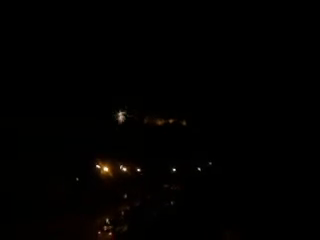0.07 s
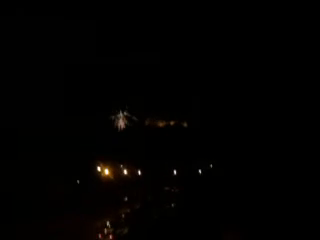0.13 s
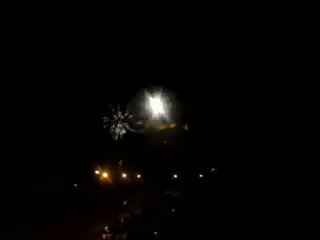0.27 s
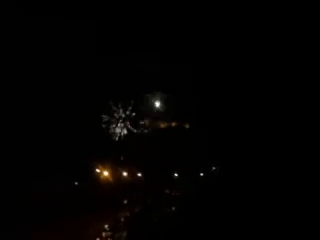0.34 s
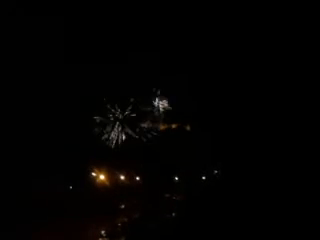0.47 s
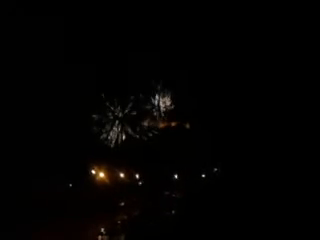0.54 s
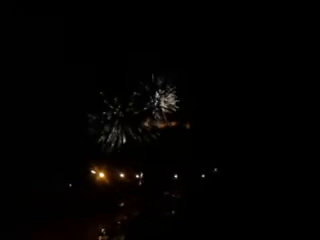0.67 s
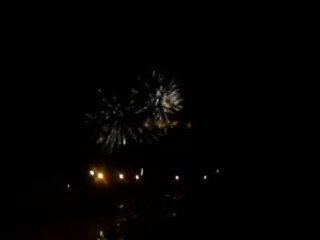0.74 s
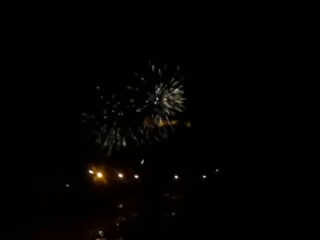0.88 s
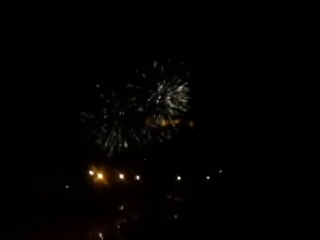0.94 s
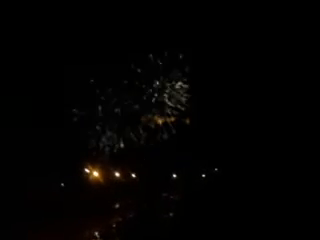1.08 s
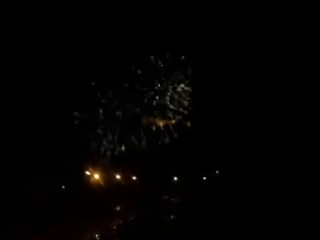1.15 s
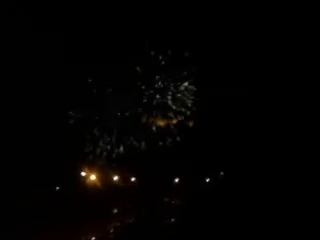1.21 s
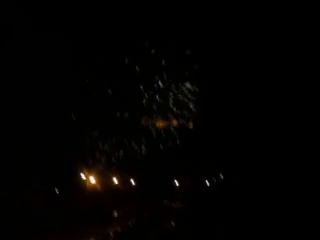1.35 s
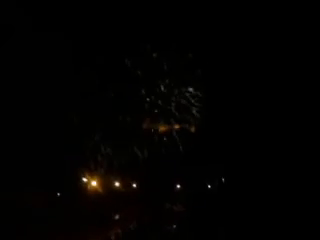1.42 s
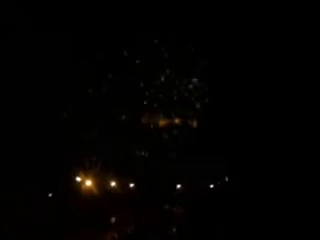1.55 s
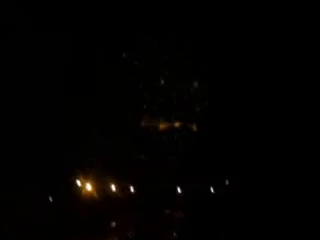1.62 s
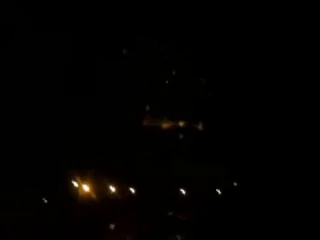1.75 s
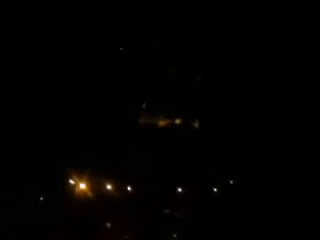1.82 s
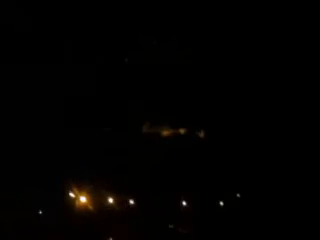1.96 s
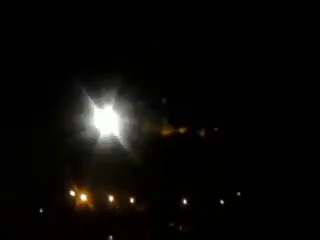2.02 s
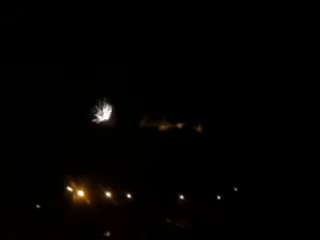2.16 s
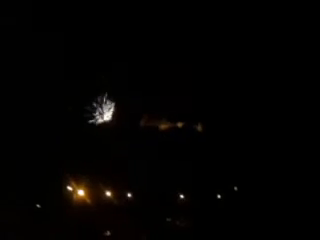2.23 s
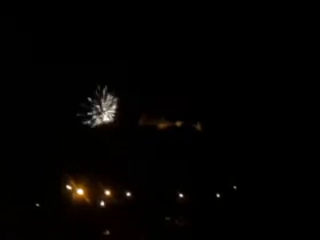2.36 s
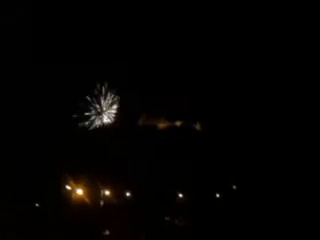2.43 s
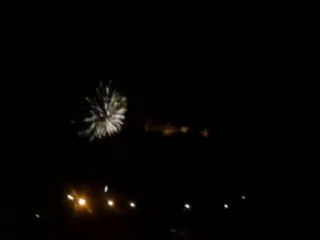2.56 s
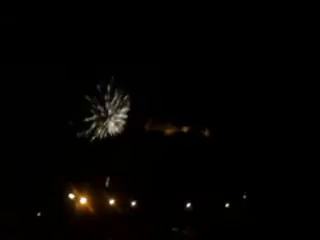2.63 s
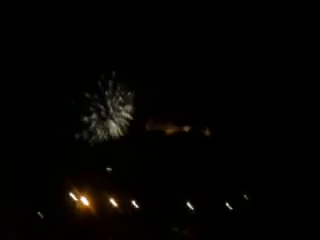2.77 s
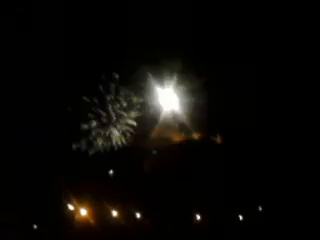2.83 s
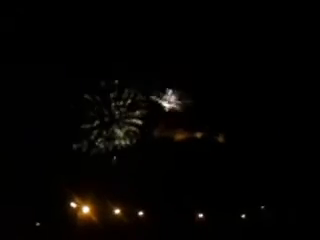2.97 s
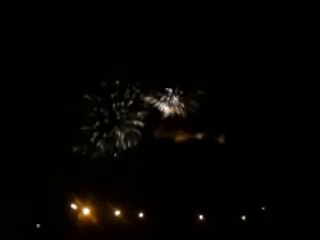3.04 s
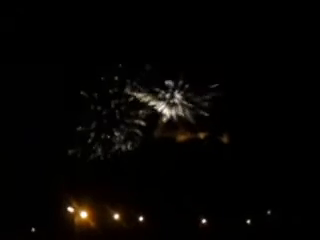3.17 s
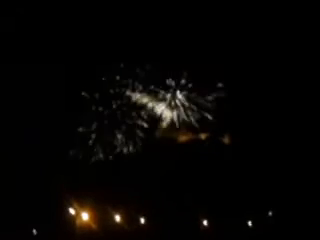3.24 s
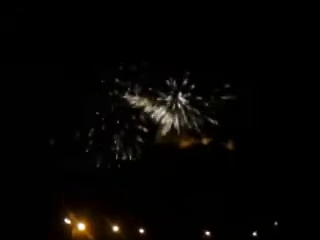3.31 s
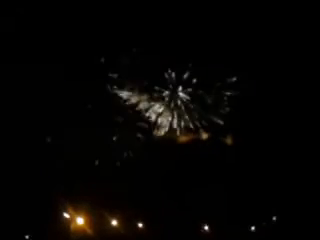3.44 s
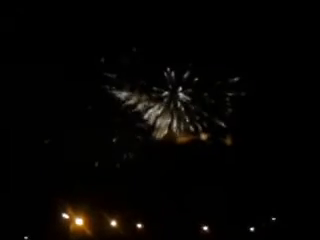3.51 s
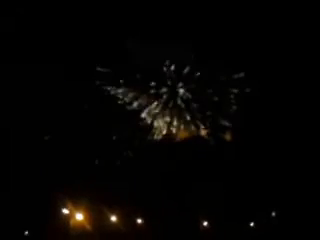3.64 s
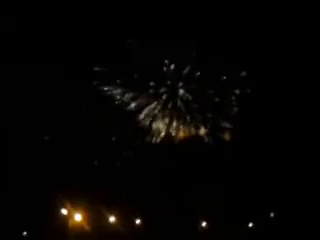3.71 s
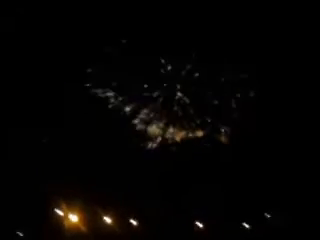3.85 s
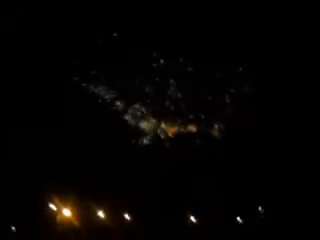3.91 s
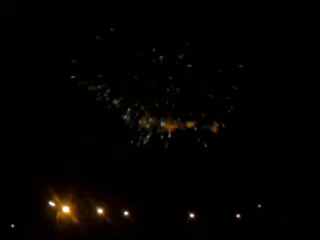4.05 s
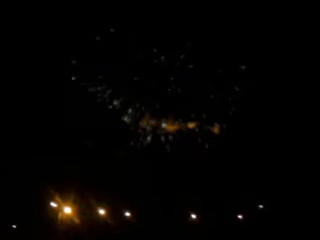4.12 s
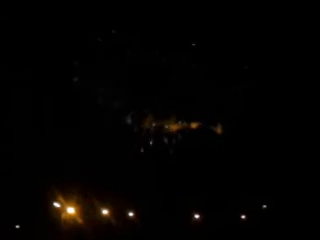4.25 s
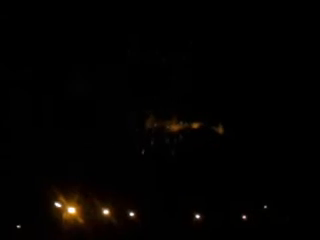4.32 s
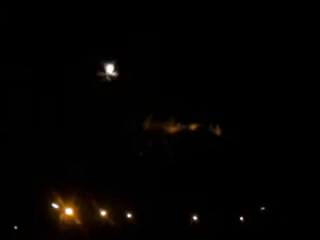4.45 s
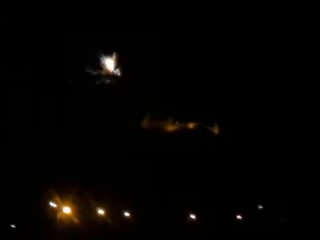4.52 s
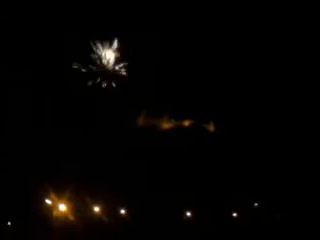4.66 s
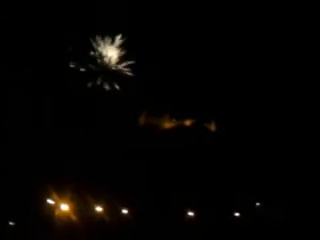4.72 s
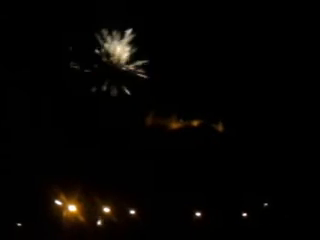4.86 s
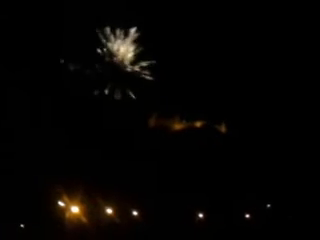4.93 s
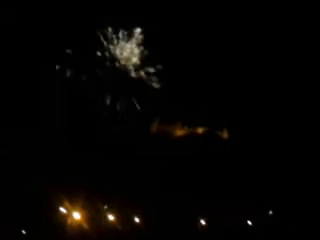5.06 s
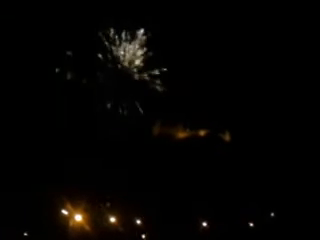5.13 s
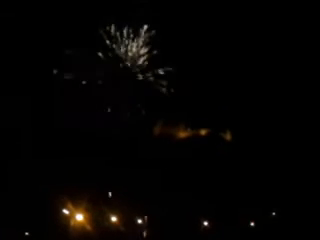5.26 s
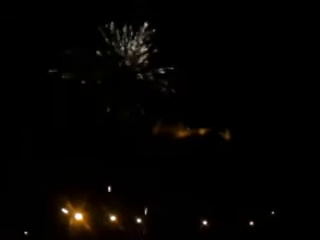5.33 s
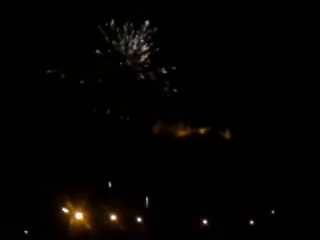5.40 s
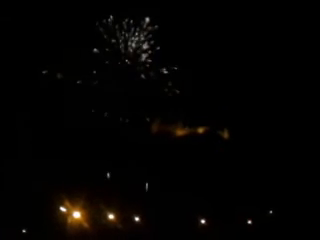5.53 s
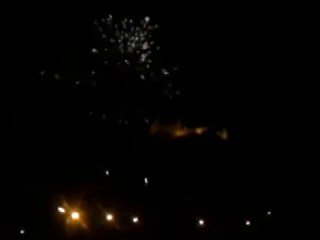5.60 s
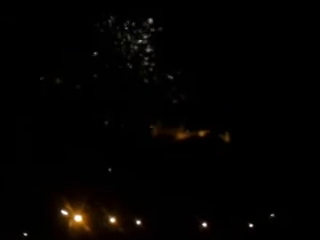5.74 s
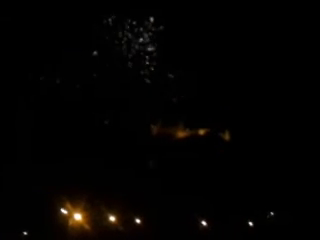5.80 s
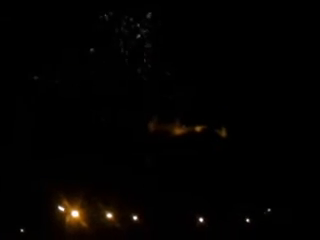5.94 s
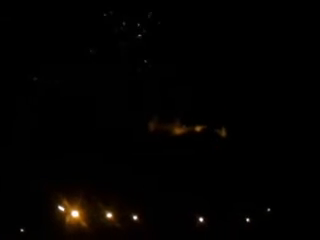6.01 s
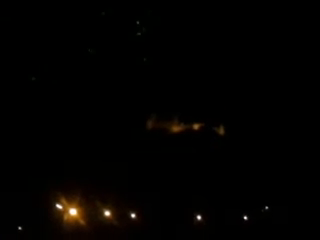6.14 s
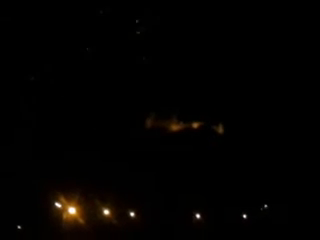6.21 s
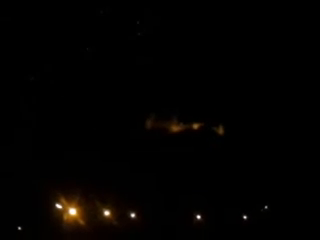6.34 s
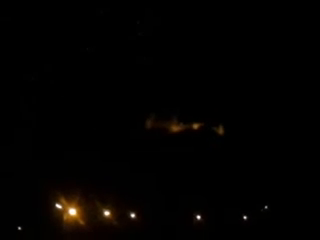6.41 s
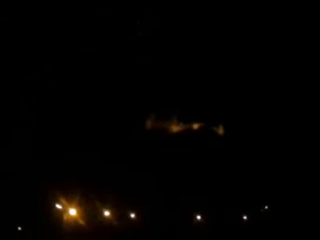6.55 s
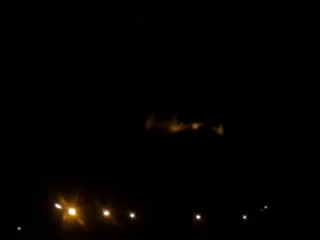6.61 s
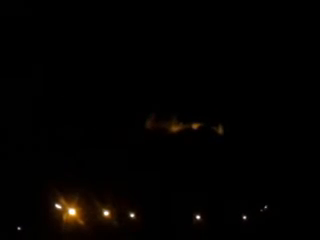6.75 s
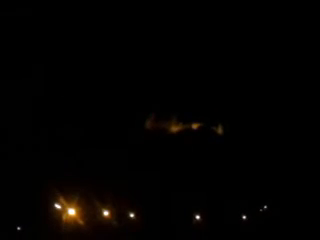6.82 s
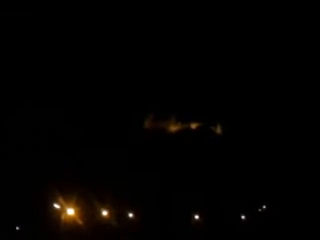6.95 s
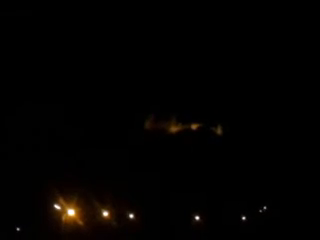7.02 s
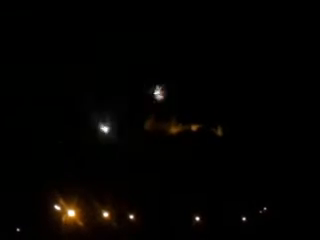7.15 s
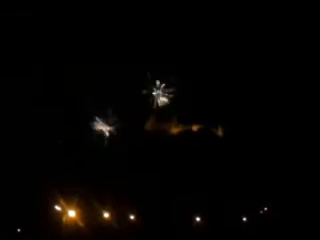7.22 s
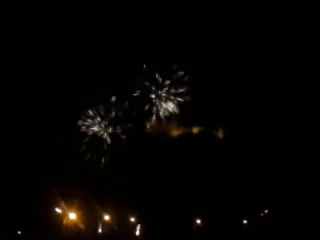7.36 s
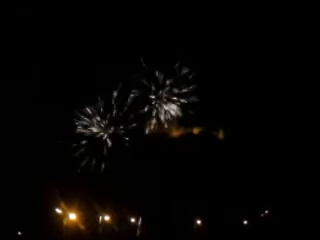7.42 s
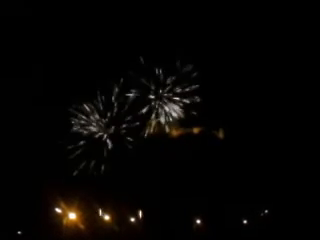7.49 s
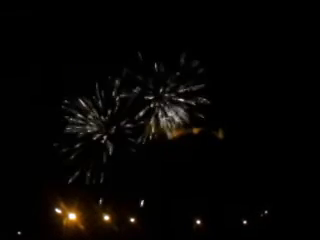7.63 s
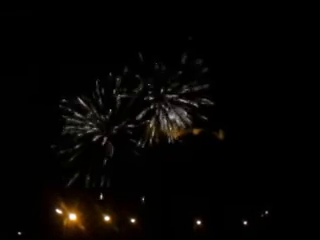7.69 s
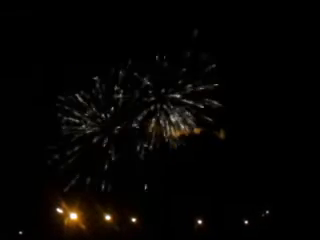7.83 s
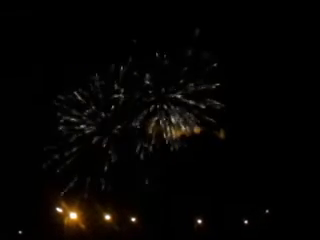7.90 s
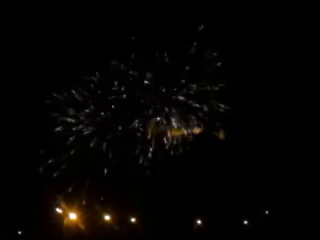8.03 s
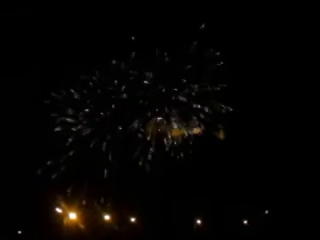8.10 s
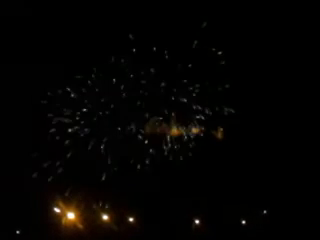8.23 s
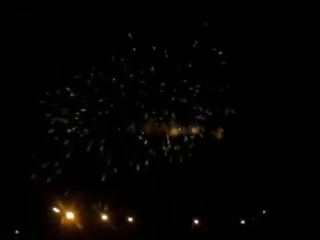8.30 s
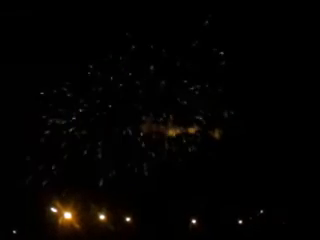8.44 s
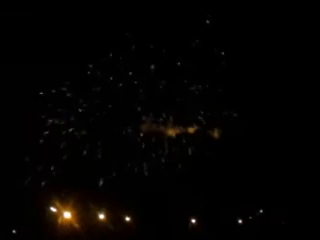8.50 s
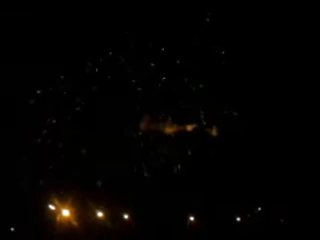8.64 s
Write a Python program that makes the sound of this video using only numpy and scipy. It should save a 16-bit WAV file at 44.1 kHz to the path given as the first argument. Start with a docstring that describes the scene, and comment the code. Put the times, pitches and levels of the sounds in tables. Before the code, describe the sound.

Distant firework shells burst with sharp, overloaded cracks and slapping echoes off buildings, amid scattered mortar pops and a long rolling rumble.

```python
"""Firework shells burst far off over a built-up shore at night. A rumble of sound rolling back from the town
runs throughout, as noise that swells and sinks; short clean pops, most likely mortars, and slap echoes dot it.
Each burst brings a bright crack in a dense swarm of near reflections, then echoes from two walls and a long wash.
All arrivals pass through a narrow-band microphone, which clips the loudest of them."""
import sys
import numpy as np
from scipy import signal
from scipy.fft import rfft, irfft
from scipy.io import wavfile
from scipy.ndimage import uniform_filter1d

SR = 44100
rng = np.random.default_rng(int(sys.argv[2]) if len(sys.argv) > 2 else 0)


def generate_wav(signal):
    """Clip the signal to [-1, 1] and save it as 16-bit WAV at the path in sys.argv[1]."""
    frames = np.transpose(np.atleast_2d(signal))
    scaled = np.clip(frames, -1, 1) * 32767
    pcm = np.round(scaled).astype(np.int16)
    wavfile.write(sys.argv[1], SR, pcm)


N = 382347

# All levels are in dB; a t60 is the time in which a sound fades by 60 dB.
# A list of four levels always holds the low, middle, high and top band.

# The shell bursts. Each row: time in seconds, swarm level in dB, swarm t60 in seconds, crack level in dB,
# crack t60 in seconds, near wall echo in dB, its t60 in seconds, far wall echo in dB.
SHELLS = [(0.659, 2.5, 0.64, 6.5, 0.04, -3.5, 0.16, -8.5), (0.96, 4, 0.68, 5, 0.084, 1, 0.21, -5),
          (2.706, 2, 0.56, -2.5, 0.044, -2.5, 0.052, -8.5), (3.49, 4, 0.62, 4.5, 0.18, 2.5, 0.19, -3),
          (5.069, 0.5, 0.6, 8.5, 0.098, 0.7, 0.078, -8.5), (7.756, 7, 0.41, 8, 0.03, 4.9, 0.17, -4),
          (7.824, 2, 0.63, 4.5, 0.076, -3.5, 0.11, -5.5)]
# How much later each burst comes back. Each row: near wall delay in seconds, far wall delay in seconds.
ECHO_DELAYS = [(.238, .589), (.249, .58), (.238, .509), (.242, .583), (.242, .527), (.245, .548),
               (.226, .504)]


def from_db(db):
    """Turns a level in dB into a gain."""
    return 10 ** (np.asarray(db) / 20)


def drift(rate_hz):
    """Slow chance: noise smoothed twice by a one-pole low-pass, scaled to a spread of 1."""
    r = np.exp(-2 * np.pi * rate_hz / SR)
    noise = rng.standard_normal(N + SR)
    slow = signal.lfilter([1], [1, -2 * r, r * r], noise)[SR:]   # drop the filter's first second
    return slow / slow.std()


def add_arrival(power, start_s, level_db, rise_s, t60_s):
    """Adds the power of one arrival: a short rise, then an even decay, for 2 seconds at most."""
    start = round(start_s * SR)
    t = np.arange(min(N - start, 2 * SR)) / SR
    rise = np.minimum(t / rise_s, 1) ** 2
    decay = from_db(-60 * np.maximum(t - rise_s, 0) / t60_s)
    gain = np.reshape(from_db(level_db), (-1, 1))
    power[:, start:start + len(t)] += (gain * rise * decay) ** 2


def band_responses(size=4096):
    """The microphone's colour of distant sound, split into four short filter responses of energy 1."""
    # Shape of the colour. Each row: frequency in Hz, relative level in dB.
    colour = np.array([(30, -39.5), (70, -19.5), (125, -18.5), (165, -11.5), (205, -4.5), (255, 0.5),
                       (370, -2), (530, -10.5), (690, -9.5), (810, -1), (945, -3.5), (1200, -18),
                       (1550, -20.5), (2150, -17), (2500, -26), (3000, -30), (3600, -36), (4300, -47),
                       (5000, -66)])
    # Edges between the four bands, in Hz.
    low, middle, high = [600, 1300, 2700]
    hz = np.maximum(np.fft.rfftfreq(size, 1 / SR), 1)
    level_db = np.interp(np.log(hz), np.log(colour[:, 0]), colour[:, 1])
    # folding the cepstrum gives minimum phase: the response starts at once, with nothing ahead of it
    cepstrum = irfft(np.log(from_db(level_db)))
    cepstrum[1:size // 2] *= 2
    cepstrum[size // 2 + 1:] = 0
    whole = irfft(np.exp(rfft(cepstrum)))
    bands = [(low, "low"), ([low, middle], "band"), ([middle, high], "band"), (high, "high")]
    responses = []
    for edge, kind in bands:
        part = signal.sosfilt(signal.butter(3, edge, kind, fs=SR, output="sos"), whole)
        responses.append(part / np.linalg.norm(part))
    return responses


def echo_grain():
    """Reflections are separate and uneven: noise whose strength flutters within milliseconds."""
    grain = rng.standard_normal(N) * from_db(1.5 * drift(250))
    return grain / grain.std()


def night_hum():
    """Steady power per band of the town at night."""
    # Level of the four bands in dB.
    hum_db = [-58, -61, -67, -80.5]
    return from_db(np.c_[hum_db]) ** 2


def faint_slaps():
    """Power per band of chance slaps, each band on its own level, as a multiple of the rumble."""
    per_s, level_db, spread_db = 9, 3, 4
    t60_s, rise_s = 0.074, 0.017
    happens = rng.random(N) < per_s / SR
    hits = happens * from_db(level_db + spread_db * rng.standard_normal((4, N))) ** 2
    # -120 because this is power: it makes a 60 dB fade in t60_s
    fading = signal.lfilter([1], [1, -from_db(-120 / (t60_s * SR))], hits + 1e-18)
    return uniform_filter1d(fading, size=round(rise_s * SR))


def roll():
    """Power per band: countless far echoes arrive in lumps, partly in step; faint slaps ride on them."""
    # The rumble over time. Each row: time in seconds, level in dB, brightness in dB.
    rumble = [(0.0, -33, 2), (0.41, -28, -4), (0.62, -36, 1.5), (1.602, -33.5, 2), (2.03, -27.5, -2.5),
              (2.411, -32, -0.5), (2.68, -40, 2.4), (3.399, -40.5, 6), (3.95, -39, 8.5), (4.35, -31.5, -1),
              (4.52, -30.5, -11), (4.6, -38, 2.5), (4.75, -35, -1), (5.05, -32.5, -2.5), (5.7, -40, 4.5),
              (6.08, -42.5, 4), (6.599, -40, 0.2), (6.71, -39, -1.6), (6.851, -51, 1), (6.92, -59, 8.5),
              (6.97, -54, -2), (7.25, -56, -5), (7.701, -71.5, -0.3), (8.67, -41, 2.5)]
    # Share of the four bands in the rumble, in dB.
    rumble_db = [-2.4, -1, -8.5, -28.5]
    # How strongly each of the four bands follows the brightness, as a factor.
    brightens = [0.71, 1.1, 1.4, 1.6]
    # Long wash after each burst: level of the four bands in dB against the swarm, then their t60 in seconds.
    wash_db = [-27.5, -28.5, -28.5, -50]
    wash_t60_s = [2.84, 2.83, 2.04, 1.9]
    wash_rise_s = 0.13

    times, levels_db, brights_db = np.transpose(rumble)
    clock = np.arange(N) / SR
    level_db = np.interp(clock, times, levels_db)
    bright_db = np.interp(clock, times, brights_db)
    power = from_db(level_db + np.outer(brightens, bright_db) + np.c_[rumble_db]) ** 2
    for s, swarm_db, *_ in SHELLS:
        for band in range(4):
            add_arrival(power[band:band + 1], s, swarm_db + wash_db[band], wash_rise_s, wash_t60_s[band])

    faint = faint_slaps()
    together_db = 1.3 * drift(7) + 0.8 * drift(45)   # shared by all bands
    lumps = [from_db(together_db + 1.3 * drift(17) + 1.5 * drift(6.4)) ** 2 for _ in power]
    return power * (np.array(lumps) + faint)


def slaps():
    """Power per band of slap echoes from buildings, each a smear of reflections from one wall."""
    # The slaps. Each row: time in seconds, low level in dB, upper level in dB, t60 in seconds.
    slap_rows = [(0.033, -29, -28, .06), (0.139, -17.5, -38, 0.1), (0.479, -23, -30, 0.46),
                 (0.527, -16.5, -15.5, 0.026), (1.15, -12, -13, 0.36), (1.681, -29, -28, .08),
                 (1.889, -17, -33, 0.059), (2.131, -23.5, -33, .16), (2.497, -21, -32.5, 0.27),
                 (2.775, -8.5, -22, .15), (2.959, -10.5, -19, 0.12), (3.089, -41, -16.5, 0.078),
                 (3.143, -31, -30, 0.037), (3.27, -24, -29.5, .2), (3.678, -8, -7.5, 0.039),
                 (3.844, -33, -25, 0.036), (4.008, -38, -19.5, .06), (4.415, -24.5, -34, .092),
                 (4.588, -35, -28.5, 0.064), (4.67, -26, -43, 0.15), (4.728, -24.5, -30, .077),
                 (5.028, -20, -34, 0.18), (5.174, -11, -17, 0.052), (5.347, -22, -35, 0.036),
                 (5.531, -38.5, -22, 0.059), (5.652, -27, -25.5, 0.11), (5.809, -8.5, -11, 0.096),
                 (5.874, -29, -21, .08), (5.974, -25.5, -30.5, 0.098), (6.103, -32, -24, 0.059),
                 (6.24, -29.5, -36, 0.23), (6.295, -34.5, -29.5, 0.085), (6.368, -30, -26, 0.08),
                 (6.556, -23, -31, 0.33), (7.003, -41.5, -49, 0.14), (7.945, -5.5, -17.5, .15),
                 (8.151, -28, -23, 0.074), (8.538, -24, -23.5, 0.13)]
    # High band and top band in dB against the upper level.
    high_db, top_db = [-8, -24.5]
    power = np.zeros((4, N))
    for s, low_db, upper_db, t60_s in slap_rows:
        levels_db = [low_db, upper_db, upper_db + high_db, upper_db + top_db]
        add_arrival(power, s - .002, levels_db, .004, t60_s)
    return power


def pops(low_response):
    """A pop is about one and a half swings of pressure, a low thump right behind and a faint tail."""
    # Pops, most likely mortars firing. Each row: time in seconds, snap peak in dB, snap pitch in Hz,
    # thump peak in dB.
    pop_rows = [(0.1152, -4.5, 1350, -33), (0.2727, -14, 1360, -18), (0.3922, -3, 1480, -16),
                (0.594, -3.5, 700, -17), (0.6118, -4, 1550, -9.5), (1.3137, -4, 1510, -15),
                (1.4538, -15, 1230, -12.5), (1.5695, -7, 1300, -13), (1.7046, -13.5, 720, -15),
                (1.8622, -4, 1470, -14), (2.0128, -9.5, 1330, -8.5), (2.4713, -3.5, 1630, -24),
                (2.6052, -14.5, 1290, -30), (2.6339, -11, 1660, -13), (3.0057, -4.5, 1490, -30.5),
                (3.0282, -4.5, 750, -13), (3.1167, -8.5, 833, -19), (3.222, -5.5, 1590, -7.5),
                (3.3619, -11.5, 1645, -12.5), (3.46, -3.5, 1690, -13), (5.4654, -6, 740, -10),
                (5.813, -14, 610, -9), (5.8643, -12, 1930, -31)]
    # Level of the tail's four bands in dB against the snap.
    tail_db = [-17, -19.5, -18, -23.5]
    snap_swings = .8   # length of a snap, in swings
    snaps, thumps, tails = np.zeros(N), np.zeros(N), np.zeros((4, N))
    t = np.arange(-200, 201) / SR
    for s, snap_db, hz, thump_db in pop_rows:
        at = round(s * SR)
        swing = np.cos(2 * np.pi * hz * t)
        fade = np.exp(-(hz * t / snap_swings) ** 2)
        snaps[at - 200:at + 201] -= from_db(snap_db) * swing * fade
        thumps[at] = -from_db(thump_db) / np.abs(low_response).max()
        add_arrival(tails, s - .002, np.add(snap_db, tail_db), .002, .05)
    return snaps + signal.fftconvolve(thumps, low_response)[:N], tails


def wall_echoes():
    """Power per band: two walls send each bang back, and the streets behind them answer."""
    # Share of the four bands in the near wall's echo, then in the far wall's, in dB.
    near_share_db = [-6, -6, -13, -24.5]
    far_share_db = [-8.5, -4, -10.5, -21]
    near_rise_s, far_rise_s, far_t60_s = 0.0033, 0.0034, 0.056
    near_streets_db, near_streets_t60_s = -18, 0.17   # levels against the wall's own echo
    far_streets_db, far_streets_t60_s = -15, .5
    lead_db, lead_s = -13.5, 0.045   # nearer house fronts swell in just ahead of the far wall
    power = np.zeros((4, N))
    for (s, *_, near_db, near_t60_s, far_db), (near_s, far_s) in zip(SHELLS, ECHO_DELAYS):
        near = np.add(near_db, near_share_db)
        far = np.add(far_db, far_share_db)
        add_arrival(power, s + near_s - .002, near, near_rise_s, near_t60_s)
        add_arrival(power, s + near_s, near + near_streets_db, .03, near_streets_t60_s)
        add_arrival(power, s + far_s - .002, far, far_rise_s, far_t60_s)
        add_arrival(power, s + far_s, far + far_streets_db, .03, far_streets_t60_s)
        add_arrival(power, s + far_s - lead_s, far + lead_db, lead_s, far_t60_s)
    return power


def wall_fronts(responses):
    """Each wall returns the bang's pressure front as one clean knock."""
    # Peak of the knock's low and middle part in dB, against the echo level.
    front_db = [-7.5, -3.5]
    lag_s = .004
    knocks = np.zeros(N)
    for (s, *_, near_db, _, far_db), delays in zip(SHELLS, ECHO_DELAYS):
        at = ((s + np.array(delays) + lag_s) * SR).astype(int)
        knocks[at] = -from_db([near_db, far_db])
    shape = sum(from_db(db) * h / np.abs(h).max() for db, h in zip(front_db, responses))
    return signal.fftconvolve(knocks, shape)[:N]


def bursts():
    """Power per band of the bangs: a bright crack and a lumpy swarm of near reflections."""
    # Share of the four bands in the swarm, then in the crack, in dB.
    swarm_share_db = [-4.5, -7, -14, -25]
    crack_share_db = [-4, -6.5, -8, -13]
    power = np.zeros((4, N))
    for s, swarm_db, swarm_t60_s, crack_db, crack_t60_s, *_ in SHELLS:
        add_arrival(power, s - .006, np.add(swarm_db, swarm_share_db), .010, swarm_t60_s)
        add_arrival(power, s - .004, np.add(crack_db, crack_share_db), .017, crack_t60_s)
    lumps = from_db(0.42 * drift(40)) ** 2
    return power * lumps


def scene():
    """All smeared arrivals shape one grainy noise in four bands; snaps, thumps and knocks stay clean."""
    responses = band_responses()
    clean_pops, pop_tails = pops(responses[0])
    power = night_hum() + roll() + slaps() + pop_tails + wall_echoes() + bursts()
    pressure = np.sqrt(power) * echo_grain()
    smeared = sum(signal.fftconvolve(p, h)[:N] for p, h in zip(pressure, responses))
    return (smeared + clean_pops + wall_fronts(responses))[None]


def record(dry):
    """The input cuts off near 5 kHz and then clips hard; clipping alone fills the treble above."""
    overload, cutoff_hz = .71, 16700   # clipping level as a sample value; upper end of the treble
    narrow = signal.sosfilt(signal.cheby2(10, 60, 5050, fs=SR, output="sos"), dry)
    clipped = np.clip(narrow, -overload, overload)
    # a 5 Hz high-pass takes out any constant offset
    settled = signal.sosfilt(signal.butter(1, 5, "high", fs=SR, output="sos"), clipped)
    return signal.sosfilt(signal.cheby2(12, 70, cutoff_hz, fs=SR, output="sos"), settled)


dry = scene()
out = record(dry)
generate_wav(out)
```